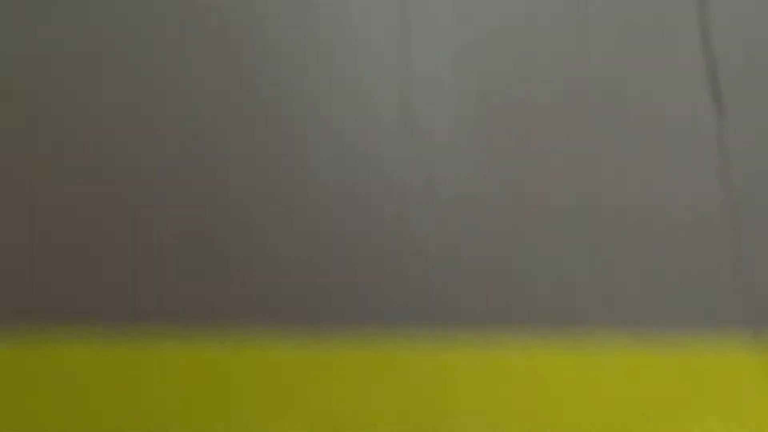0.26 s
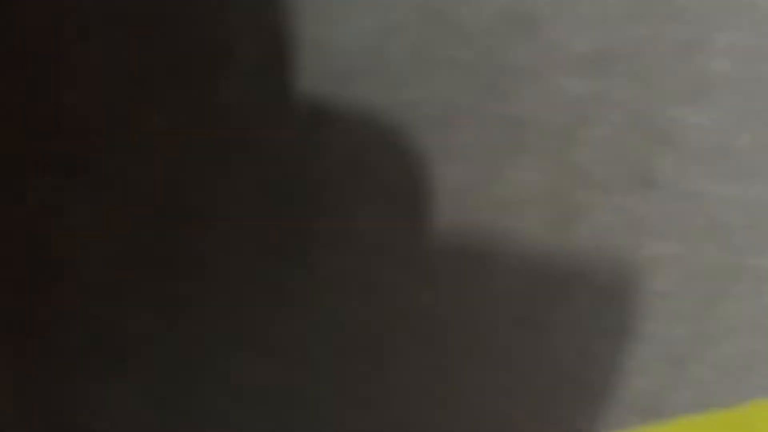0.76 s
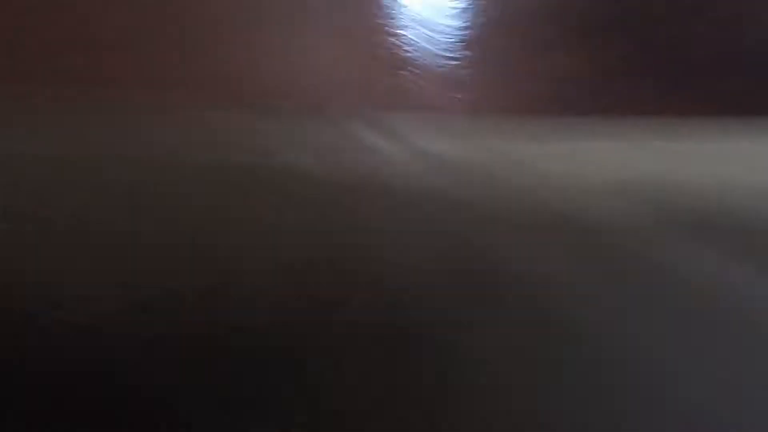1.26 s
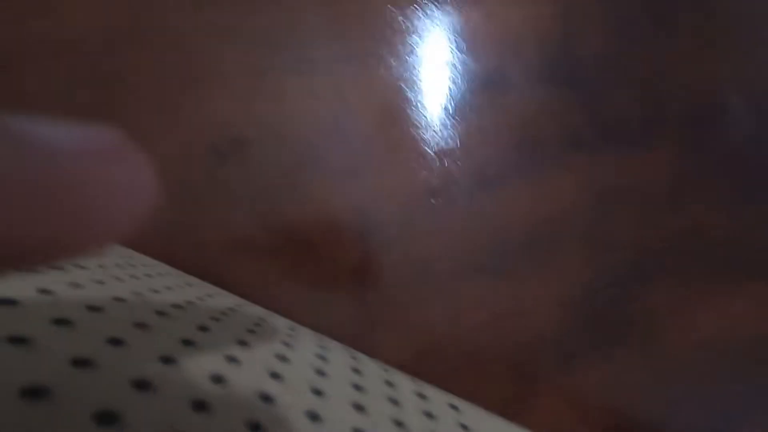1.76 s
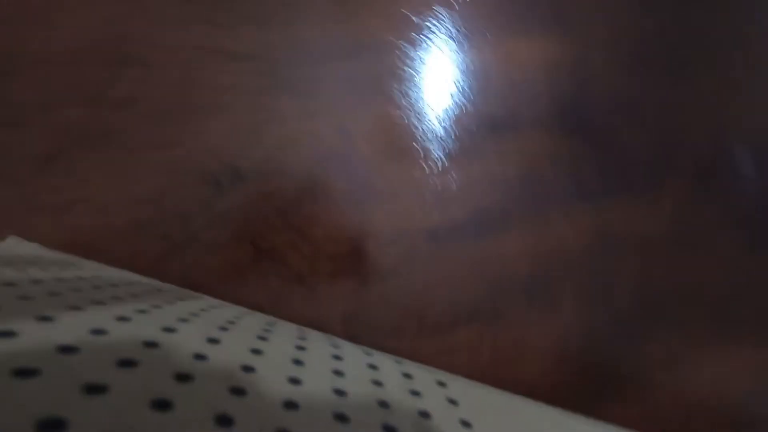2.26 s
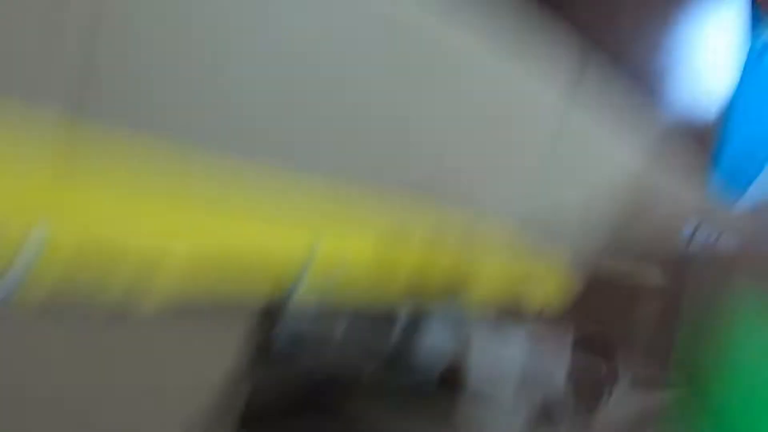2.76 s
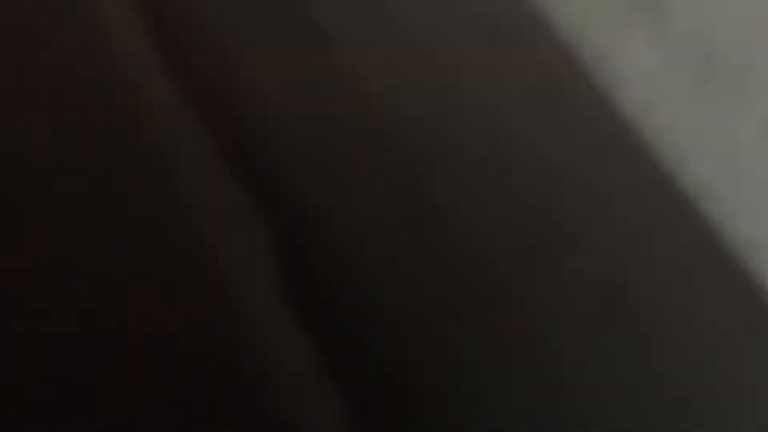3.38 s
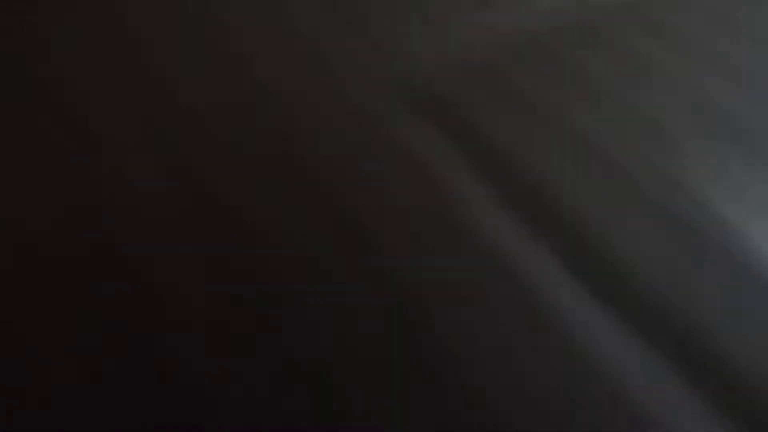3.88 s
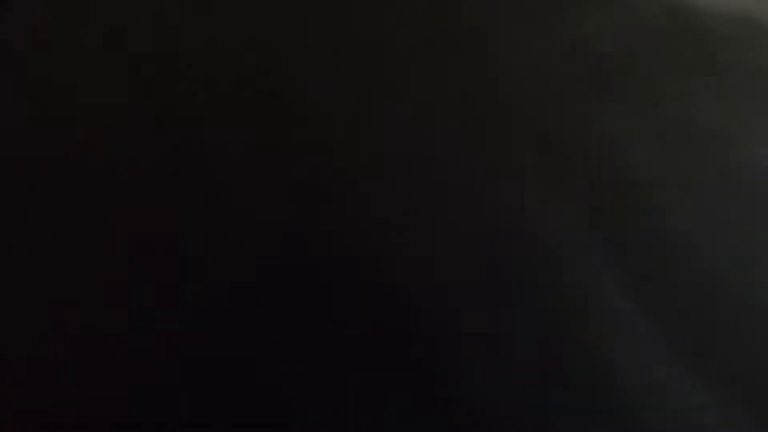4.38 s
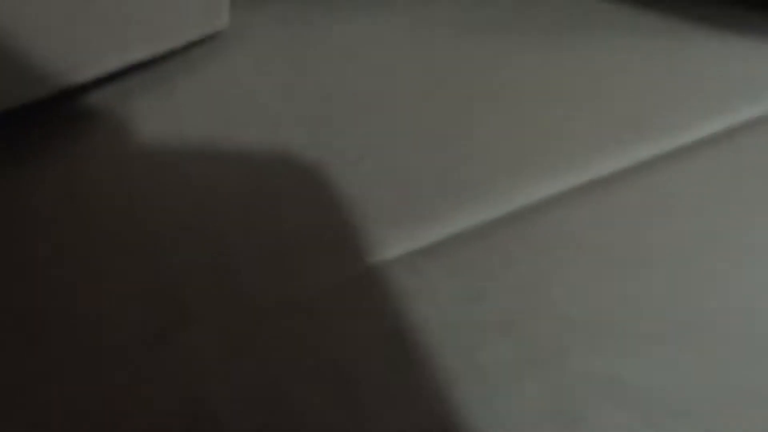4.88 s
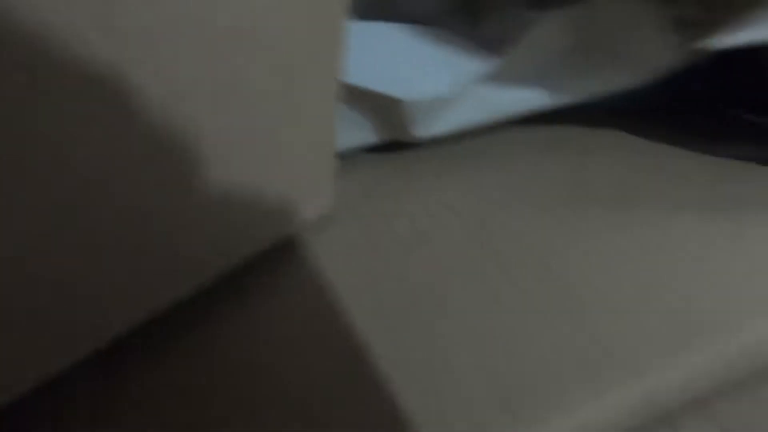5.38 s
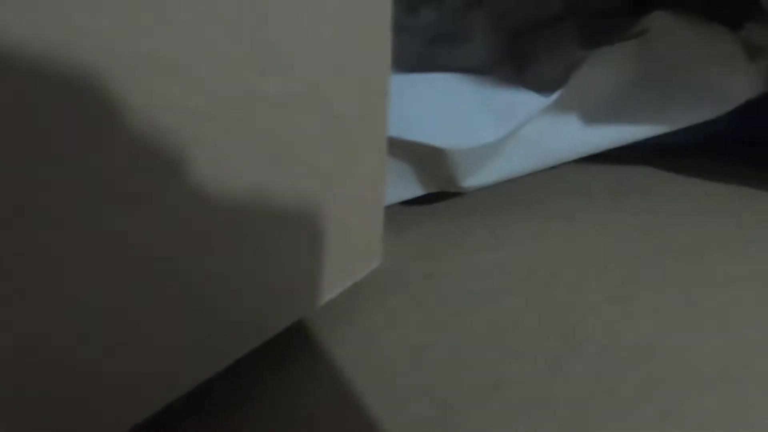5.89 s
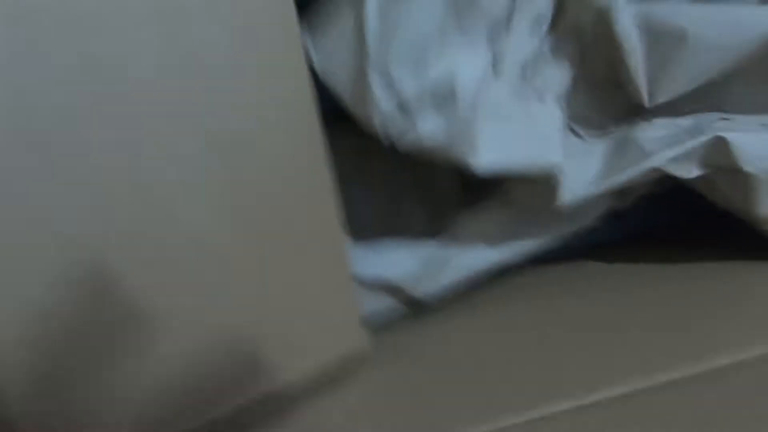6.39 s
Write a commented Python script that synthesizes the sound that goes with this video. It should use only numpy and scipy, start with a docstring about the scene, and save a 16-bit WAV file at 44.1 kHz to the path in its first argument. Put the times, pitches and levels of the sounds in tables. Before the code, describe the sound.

Close cardboard handling in a small room, with faint appliance hum and airy whirr beneath. From 0 to 0.4 s, soft dry rubbing and light taps; around 0.45-0.65 s, strong hollow knocks and a short raspy scrape, then a crack at 0.85. From 1.15 to 1.5 s, sharp cracks, tape-like snaps and thuds cluster, with a low puff of air near 1.3. More buckling and gritty rubbing run from 1.7 to 2.15 s, a knock at 2.4, then a lull with tiny paper crinkles until 3.05. Bumps resume at 3.2; low booms and cracks surge at 3.6-3.75. The heaviest thuds fall at 4.0-4.45 s, with a brief squeak snapping free at 4.3. Deep bumps follow to 4.8 s, then sparse rubbing, soft scrapes, a paper tick at 6.05 and a last crack with a scrape at 6.62.

```python
"""A hand rubs over board above a faint appliance hum; then knocks, cracks and scrapes follow as a cardboard
shipping box is turned over and opened on a table, close to the microphone, in a small room.
Friction is random stick-slip clicks through resonances; thuds are decaying panel modes, cracks damped bursts.
Tape snaps, paper crinkles, a flap squeaks and one puff of air buffets the ports. Swaying pushes air and
booms the cavity; hum is wavering sines, whirr and room air are coloured noise; the stereo width varies."""
import sys
import numpy as np
from scipy import signal
from scipy.fft import rfft, irfft, next_fast_len
from scipy.io import wavfile
from scipy.ndimage import uniform_filter1d, map_coordinates

SR = 44100
rng = np.random.default_rng(int(sys.argv[2]) if len(sys.argv) > 2 else 0)


def inscribe(sig):
    """Save sig as 16-bit PCM at rate SR to the path in sys.argv[1].

    A 1-D sig is mono; a 2-D sig holds one channel per row.
    Samples are clipped to [-1, 1] before scaling.
    """
    pcm = np.round(np.clip(np.atleast_2d(sig).T, -1, 1) * 32767)
    wavfile.write(sys.argv[1], SR, pcm.astype(np.int16))


N = 292816
TIME = np.arange(N) / SR


def from_db(db):
    """Amplitude ratio of a level in decibels."""
    return 10 ** (np.asarray(db) / 20)


def rms_one(x):
    """Normalise the effective value to 1."""
    return x / np.sqrt(np.mean(x ** 2) + 1e-20)


def peak_one(x):
    """Normalise the largest excursion to 1."""
    return x / (np.abs(x).max() + 1e-20)


def evened(x):
    """Level normalisation: divide by the running rms over a tenth of a second."""
    return x / np.sqrt(uniform_filter1d(x ** 2, size=SR // 10) + 1e-12)


def gains(rows):
    """Interpolate the level columns of a curve in dB and return them as gains at every sample."""
    times, *columns = np.transpose(rows)
    return [from_db(np.interp(TIME, times, levels)) for levels in columns]


def add(track, start_s, sound):
    """Superposition: mix a sound into a track from start_s on."""
    at = max(round(start_s * SR), 0)
    track[..., at:at + sound.shape[-1]] += sound[..., :max(N - at, 0)]


def coloured(x, spectrum):
    """Spectral shaping: filter by a curve interpolated in dB over log frequency."""
    size = next_fast_len(N + 4096)
    hz, db = np.transpose(spectrum)
    bins = np.maximum(np.arange(size // 2 + 1) * SR / size, 1)
    response = from_db(np.interp(np.log(bins), np.log(hz), db))
    return irfft(rfft(x, size) * response, size)[..., :N]


def butter(x, hz, kind, order=2):
    """Butterworth filtering: a maximally flat passband."""
    sections = signal.butter(order, np.clip(hz, 10, .45 * SR), kind, fs=SR, output="sos")
    return signal.sosfilt(sections, x)


def resonance(x, hz, width_hz):
    """Damped resonator: a two-pole filter whose bandwidth sets how fast it decays."""
    r = np.exp(-np.pi * width_hz / SR)
    numerator = np.array([1, 0, -1]) * (1 - r * r) / 2
    return signal.lfilter(numerator, [1, -2 * r * np.cos(2 * np.pi * hz / SR), r * r], x)


def drift(rate, size=N):
    """Random fluctuation: straight lines between Gaussian values of spread 1, rate of them a second."""
    knots = rng.standard_normal(4000)
    return np.interp(np.arange(size) / SR * rate, np.arange(len(knots)), knots)


def slips(per_s, spread_db, size=N):
    """Stick-slip: fibres catch and let go in random clicks whose sizes scatter upwards by spread_db."""
    sizes = from_db(spread_db * np.minimum(rng.exponential(1, size), 4)) * rng.choice([-1, 1], size)
    return rms_one(sizes * (rng.random(size) < per_s / SR))


def scattered(x, decay_s, rate):
    """Multipath interference: a drifting mix of flat-spectrum scattering paths, of constant total power."""
    t, out = np.arange(512) / SR, 0
    shares = np.array([drift(rate) for _ in range(4)])
    for share in shares / np.linalg.norm(shares, axis=0):
        response = rfft(rng.standard_normal(len(t)) * np.exp(-t / decay_s), 4096)
        paths = irfft(response / np.abs(response))[:1024]   # keep the phases only
        out = out + share * signal.oaconvolve(x, paths)[:N]
    return out


# Partials of the appliance hum: pitch_hz [Hz], level_db [dB, relative]
HUM_PARTIALS = [(118.4, -55), (261, -69), (328.4, -59.5), (414.5, -61.5), (479.1, -65), (660, -73),
                (721.4, -66), (796.7, -67), (850.6, -68), (888.2, -86)]
# Spectrum of its whirr: pitch_hz [Hz], level_db [dB per Hz, relative]
FAN_SPECTRUM = [(50, -16), (130, -4), (230, 12.5), (500, 11.5), (850, -9), (1050, -26), (7500, -13),
                (16000, -27)]


def distant_fan(air_db, hum_db, waver, apart):
    """Diffuse field: noise independent at each port, and hum partials whose phase differs between ports."""
    hum = 0
    for hz, db in HUM_PARTIALS:
        port_phase = apart * hz / 500 * (1 + 0.13 * drift(1)) * np.array([[1], [-1]])
        phase = 2 * np.pi * hz * TIME + waver * drift(1.56) + port_phase
        hum = hum + from_db(db + 2 * drift(2.13)) * np.sqrt(2) * np.sin(phase)
    whirr = rms_one(coloured(rng.standard_normal((2, N)), FAN_SPECTRUM))
    return from_db(hum_db) * hum + from_db(air_db) * whirr


# Spectrum of the still room: pitch_hz [Hz], level_db [dB per Hz, relative]
ROOM_AIR_SPECTRUM = [(20, -5), (60, -9), (200, -9), (800, -76), (2000, -32), (7000, -39.5), (16000, -78)]


def background(air_db):
    """Stationary noise: still room air at a constant level."""
    return from_db(air_db) * rms_one(coloured(rng.standard_normal(N), ROOM_AIR_SPECTRUM))


# A hand slides over the board, pressing harder and letting go: start_s [s, hardest press], swell_s [s],
# fade_s [s], rasp_db [dB, relative], drone_db [dB re rasp], hiss_db [dB re rasp], before the friction mix
STROKES = [(0.12, 1, 0.3, -56.5, 10, 3.5), (0.35, 0.21, 0.45, -46, 7.5, -9.5),
           (0.63, 0.11, 0.096, -29, 9, -15.5), (0.86, 0.22, 0.41, -45, 5.5, -9),
           (1.151, 0.042, 0.028, -41.5, 10, -1.5), (1.255, 0.14, 1, -40.5, 7.5, -4.5),
           (1.455, 0.075, 0.15, -36, 17.5, -5.5), (1.783, 0.053, 0.15, -30, 13.5, -10),
           (2.0, 0.029, 0.18, -36, 19.5, -3.5), (2.11, 0.28, 0.21, -29.5, 11, -13),
           (2.35, 0.15, 0.17, -35, 6.5, -19), (2.55, 0.2, 0.18, -41, 9.5, -12),
           (3.181, 0.077, 0.37, -37, 10, -34), (3.409, 0.27, 0.13, -48.5, 14.5, 11.5),
           (3.658, 0.13, 0.087, -25.5, 9, -6), (3.94, 0.67, 0.33, -36.5, 7.5, -8),
           (4.03, 0.05, 0.34, -34.5, 14.5, -20), (4.317, 0.052, 0.074, -35.5, 17, -11.5),
           (4.439, 0.26, 0.29, -34.5, 8, -13), (4.785, 0.11, 0.22, -40, 14, -9.5),
           (5.11, 0.13, 0.11, -49, 7, -5), (5.408, 0.23, 0.29, -63, -4, 10.5),
           (5.47, 0.027, 0.46, -41, 11.5, -33), (5.73, 0.32, 0.32, -36.5, 3.5, -10.5),
           (6.026, 0.06, 0.23, -38.5, 10.5, -6.5), (6.35, 0.1, 0.1, -38, 4.5, -5.5),
           (6.51, 0.095, 0.24, -38, 2.5, -6)]
STROKE_RANGE_DB = 18   # a stroke gains this much during its swell and loses it during its fade


def hand_pressure():
    """Energy addition: gains of rasp, drone and hiss, overlapping strokes summed in power."""
    power = np.zeros((3, N))
    for start_s, swell_s, fade_s, db, drone_db, hiss_db in STROKES:
        away = np.maximum((start_s - TIME) / swell_s, (TIME - start_s) / fade_s)
        lifted = np.maximum(away - 1, 0) ** 2   # the hand lifts off: a steeper fall
        press_db = db - STROKE_RANGE_DB * np.minimum(away + lifted, 10)
        power += np.outer(from_db([0, drone_db, hiss_db]), from_db(press_db)) ** 2
    return np.sqrt(power)


# Spectra of panel drone, liner rasp and skin hiss: pitch_hz [Hz], level_db [dB per Hz, relative]
DRONE_SPECTRUM = [(70, -20), (140, -2), (200, 3.5), (270, -0.5), (430, -4.5), (600, -26), (4000, -82)]
RASP_SPECTRUM = [(250, -22), (540, 8.5), (720, 1.5), (900, -1), (1100, -1), (1400, -5), (1750, -11.5),
                 (2100, -13), (2800, -18.5), (15000, -84)]
HISS_SPECTRUM = [(300, 4.5), (3300, 3), (4800, -2.5), (7000, -4.5), (10000, -11.5), (13000, -17),
                 (16000, -55)]
FLUTES_PER_S = 64.8   # about how often an edge or hand bumps over the ribs of the board


def rubbing(pressure, grip_db, flicker_db, flute_db, drone_db, rasp_db, hiss_db):
    """Stick-slip friction: panels and liner are shaken together by an uneven grip and the flutes."""
    rasp, drone, hiss = pressure
    flutes = np.cumsum(FLUTES_PER_S * (1 + .5 * drift(40))) / SR
    grip = from_db(grip_db * drift(70) + flute_db * np.cos(2 * np.pi * flutes))
    fibres = slips(per_s=1800, spread_db=0.0) * grip
    panels = rms_one(coloured(slips(per_s=900, spread_db=0.5) * grip, DRONE_SPECTRUM))
    liner = rms_one(coloured(fibres * from_db(flicker_db * drift(260)), RASP_SPECTRUM))
    skin = rms_one(coloured(fibres + 0.96 * rng.standard_normal(N), HISS_SPECTRUM))
    drone_sound = from_db(drone_db) * drone * panels
    rasp_sound = from_db(rasp_db) * rasp * liner
    return drone_sound + rasp_sound + from_db(hiss_db) * hiss * skin


def crunching(pressure, per_s, level_db, damping, top_hz):
    """Granular excitation: random slips ring broad liner resonances, louder while a hand presses."""
    rasp, drone, hiss = pressure
    liner_hz = (735, 1150, 1570, 2020, 3570)
    grains = sum(resonance(slips(per_s=per_s, spread_db=0.0), hz, damping * hz) for hz in liner_hz)
    return from_db(level_db) * rasp * rms_one(butter(grains, top_hz, "low"))


def hollow(x):
    """Comb-like interference: reflections inside the box carve wandering peaks and dips into friction."""
    return .9 * x + .44 * scattered(x, decay_s=.0013, rate=9)


# How strongly the whole box sways in the hands: start_s [s], level_db [dB, relative]
SWAY = [(0.0, -43.5), (0.5, -33), (1.0, -47), (1.35, -43), (1.68, -65), (2.1, -32), (2.5, -61), (2.86, -36),
        (3.0, -39.5), (3.55, -45), (3.74, -18.5), (3.9, -42), (4.08, -31), (4.5, -23), (4.85, -38.5),
        (5.02, -35), (5.3, -71), (5.52, -28.5), (6.64, -32.5)]
# Spectrum of the pushed air: pitch_hz [Hz], level_db [dB per Hz, relative]
SWAY_SPECTRUM = [(12, -21), (25, 23.5), (38, 17.5), (60, 10.5), (110, -22), (800, -100)]


def swaying(pressure, air_db, boom_db, hand_boom_db, blow_boom_db, boom_t60, cavity_hz, width_hz):
    """Cavity resonance: sway pushes air; sway, rubbing and deep blows keep the enclosed air booming."""
    rasp, drone, hiss = pressure
    sway, = gains(SWAY)
    pushes = rms_one(coloured(rng.standard_normal(N), SWAY_SPECTRUM))
    jolts = slips(per_s=75, spread_db=1.0)
    cavity = evened(butter(resonance(jolts, cavity_hz, width_hz), 2 * cavity_hz, "low", order=4))
    t = np.arange(SR // 2) / SR
    power = (from_db(boom_db) * sway) ** 2 + (from_db(hand_boom_db) * drone) ** 2
    for start_s, db, hz in blows():
        decay = from_db(db + blow_boom_db - 60 * t / boom_t60)
        onset = np.minimum(t * cavity_hz, 1)   # one cavity cycle to build up
        add(power, start_s, (decay * onset * cavity_hz / hz) ** 2)
    return from_db(air_db) * sway * pushes + np.sqrt(power) * cavity


# A hand or flap bumps a panel, or the rocking box knocks again: start_s [s], level_db [dB peak, relative], #
# pitch_hz [Hz, struck spot]
KNOCKS = [(.196, -25.5, 209), (.433, -14.5, 147), (.483, -10, 385), (.485, -3, 192), (.625, -10.5, 159),
          (1.243, -14.5, 206), (1.416, -15.5, 292), (1.714, -19, 230), (1.931, -15.5, 240),
          (2.393, -12, 197), (3.028, -35, 308), (3.173, -17, 143), (3.33, -15.5, 156), (3.379, -11, 215),
          (3.584, -12.5, 258), (4.001, -7.5, 452), (4.021, -7, 133), (4.093, -11, 89.5),
          (4.433, -4.5, 123.8), (4.596, -11.5, 70), (4.784, -10.5, 95), (4.824, -11.5, 61.2),
          (5.449, -15.5, 136), (6.013, -13, 123.5), (6.344, -17.5, 98.4)]
# A struck panel bounces back once, a few swings later, weaker and lower
REBOUND_CYCLES, REBOUND_LOSS_DB, REBOUND_PITCH_RATIO = 3.8, 11.5, 0.67


def blows():
    """Impact and rebound: every knock and buckle, then its rebound, as (start_s, level_db, pitch_hz)."""
    first = list(KNOCKS) + [(s, thud_db, hz) for s, _, _, _, thud_db, hz, _ in BUCKLES]
    rebounds = [(s + REBOUND_CYCLES / hz, db - REBOUND_LOSS_DB, hz * REBOUND_PITCH_RATIO)
                for s, db, hz in first]
    return first + rebounds


# Bending modes of the box: pitch_hz [Hz], level_db [dB, relative]
PANEL_MODES = [(86, -3.5), (130, 0.5), (158, -10.5), (192, -2), (258, 1), (290, -1.5), (340, -1.5),
               (415, -2), (480, 3.5), (684, 2), (900, -11.5)]


def knocks(level_db, reach_octaves, chance_db, spot_t60, modes_db, lowest_t60, yield_cycles, top_ratio):
    """Modal excitation: the struck spot swings and rings modes near its pitch; high modes die sooner."""
    out, t = np.zeros(N), np.arange(SR // 3) / SR
    hz, mode_db = np.transpose(PANEL_MODES)
    t60 = lowest_t60 * np.sqrt(hz[0] / hz)
    rings = np.sin(2 * np.pi * np.outer(hz, t)) * from_db(-60 * np.outer(1 / t60, t))
    for start_s, db, spot_hz in blows():
        chance = chance_db * rng.standard_normal(len(hz))
        strength = from_db(mode_db + chance) * rng.choice([-1, 1], len(hz))
        nearness = 1 / (1 + (np.log2(hz / spot_hz) / reach_octaves) ** 2)
        modes = strength * nearness @ rings
        spot = np.sin(2 * np.pi * spot_hz * t) * from_db(-60 * t / spot_t60)
        push = 1 - np.exp(-t * spot_hz / yield_cycles)   # soft board takes a moment to yield
        swing = push * (peak_one(spot) + from_db(modes_db) * peak_one(modes))
        thud = butter(swing, [spot_hz / 2, top_ratio * spot_hz], "band")
        add(out, start_s, from_db(db + level_db) * peak_one(thud))
    return out


# A crease cracks and its panel springs over with a thud: start_s [s], crack_db [dB peak, relative],
# crack_hz [Hz], treble_db [dB, relative], thud_db [dB peak, relative], panel_hz [Hz],
# splinter_db [dB, relative to the crack's force]
BUCKLES = [(0.265, -23, 1260, 3.5, -23.5, 180, -21), (0.837, -10, 620, -9, -17.5, 144.4, -23.5),
           (1.06, -22.5, 1050, 5.5, -18, 195, -21.5), (1.1596, -5.5, 1150, -13, -15, 324, -25.5),
           (1.297, -6.5, 920, -6, -7, 176, -32), (1.444, -9, 1150, 1.5, -6.5, 275, -23),
           (1.511, -9, 960, -13, -14, 244, -5), (1.776, -10, 1110, -1, -2, 229, -14),
           (1.990, -6, 960, -10.5, -9, 227, -11.5), (2.036, -11.5, 920, -2, -10.5, 238, -17),
           (2.094, -7, 880, -9, -11.5, 268, -6), (2.127, -11, 990, -11, -13, 208, -13),
           (3.6275, -8.5, 1010, -12, -4.5, 346, -12), (3.669, -6, 770, -7, -5.5, 154, -14),
           (4.0, -4.5, 640, -0.5, 0, 201, -20), (4.3067, 1, 1050, -18, -4.5, 131, -24),
           (4.7448, -9, 790, -11, -8.5, 128, -19), (6.619, -13, 1200, -3, -8.5, 317, -9)]
# Tape and liner snap: start_s [s], level_db [dB peak, relative], pitch_hz [Hz], treble_db [dB, relative]
TICKS = [(.754, -21, 1900, -2.5), (.902, -11, 1810, -2), (.928, -23.5, 2550, 9), (1.243, -10.5, 3580, 5),
         (1.261, -12, 3970, -18), (1.376, -5.5, 1950, 7), (1.415, -8, 1080, -10), (1.422, -10.5, 1600, 0),
         (1.435, -6, 950, -18), (1.7412, -13, 1750, -2), (1.77, -19, 2020, -17), (1.788, -12, 1810, -5),
         (2.084, -14, 1500, -7), (2.104, -10.5, 950, -10), (2.968, -28.5, 1150, -1),
         (3.5597, -17.5, 2070, -19), (4.023, -14, 760, -4), (4.031, -4.5, 1050, -23),
         (4.587, -19.5, 1090, -5), (4.665, -13.5, 800, 0), (6.054, -9.5, 740, 0.5), (6.168, -21, 2500, 1)]


def breaks(tick_splinter_db):
    """Sudden fracture: every snap and crease as (start_s, level_db, pitch_hz, treble_db, splinter_db)."""
    snaps = [(*tick, tick_splinter_db) for tick in TICKS]
    creases = [(s, db, hz, bright_db, splinter_db) for s, db, hz, bright_db, _, _, splinter_db in BUCKLES]
    return snaps + creases


def cracks(level_db, damping, tick_splinter_db, splinter_cycles, strain_cycles, treble_db):
    """Strain release: splintering builds to one sharp click and dies out, sooner at high pitch."""
    lead = SR // 50
    out, t = np.zeros(N), np.arange(-lead, 2 * lead) / SR
    for start_s, db, hz, bright_db, splinter_db in breaks(tick_splinter_db):
        away = np.where(t < 0, -t / strain_cycles, t / splinter_cycles)
        splintering = from_db(splinter_db - 60 * hz * away)
        force = (t == 0) + splintering * slips(per_s=4900, spread_db=4.0, size=len(t))
        body = peak_one(butter(resonance(force, hz, damping * hz), 3.44 * hz, "low", order=3))
        edge = peak_one(butter(force, [3500, 9500], "band"))
        crack = peak_one(body + from_db(bright_db + treble_db) * edge)
        add(out, start_s + t[0], from_db(db + level_db) * crack)
    return out


# Ringing pitches of the stiff flaps: pitch_hz [Hz]
FLAP_PITCHES = [905, 1268, 1867]


def flaps_ringing(x, ring_db, width_hz):
    """Sympathetic resonance: every crack and rub also sets the flaps ringing briefly."""
    return x + from_db(ring_db) * sum(resonance(x, hz, width_hz) for hz in FLAP_PITCHES)


# A flap edge or tape dragged over the board: start_s [s], length_s [s], level_db [dB, relative],
# pitch_hz [Hz, before glide and wander], treble_db [dB re rasp]
SCRAPES = [(0.474, 0.017, -28, 920, -8.5), (.547, 0.14, -22.5, 1210, -22.5),
           (1.234, 0.047, -32, 1840, -4.5), (1.759, 0.021, -25, 1700, -12),
           (3.572, 0.014, -23.5, 1770, -15), (3.607, 0.084, -36, 786, -6), (4.016, 0.022, -10.5, 760, -23),
           (4.428, 0.023, -26, 1420, -39), (4.744, 0.11, -38.5, 1080, -26), (5.668, 0.067, -32, 570, -21),
           (5.721, 0.1, -37, 844, -17), (6.624, 0.024, -19, 910, -16)]


def scrapes(damping, chatter_db, crest, flute_db, unevenness, glide, wander, overtone_db, overtone_ratio):
    """Periodic stick-slip: an edge bumps over flutes, rising and brightening with pressure, then slips free."""
    out, size = np.zeros(N), SR // 5
    for start_s, length, db, hz, bright_db in SCRAPES:
        pressure = np.interp(np.arange(size) / SR / length, [0, np.clip(crest, .1, .9), 1], [0, 1, 0])
        flute_rate = FLUTES_PER_S * (1 + unevenness * drift(64, size=size))
        flutes = np.cumsum(flute_rate) / SR + rng.random()
        catching_db = flute_db * np.cos(2 * np.pi * flutes) + chatter_db * drift(306.0, size=size)
        force = slips(per_s=1100, spread_db=2.0, size=size) * from_db(catching_db)
        rasp = rms_one(butter(resonance(force, hz, damping * hz), 2 * hz, "low", order=3))
        over_hz = overtone_ratio * hz
        overtone = rms_one(butter(resonance(force, over_hz, 2 * damping * hz), over_hz, "low", order=3))
        rasp = rasp + from_db(overtone_db) * pressure * overtone
        # reading faster or slower bends the pitch
        speed = 1 + glide * (pressure - .5) + wander * drift(FLUTES_PER_S, size=size)
        rasp = map_coordinates(rasp, [np.cumsum(speed)], mode="mirror")
        hiss = rms_one(butter(butter(force, [3000, 10500], "band", order=3), 6700, "low", order=1))
        add(out, start_s, from_db(db) * (rasp + from_db(bright_db) * hiss) * pressure)
    return out


GUST_S, GUST_WIDTH_S = 1.29, 0.047   # a flap swings past and fans air over the ports


def gust(level_db, top_hz):
    """Turbulent pressure: independent low-frequency noise buffets each port under a bell-shaped swell."""
    eddies = butter(butter(rng.standard_normal((2, N)), top_hz, "low", order=4), 22, "high")
    return from_db(level_db) * rms_one(eddies) * np.exp(-((TIME - GUST_S) / GUST_WIDTH_S) ** 2)


# Packing paper shifts: start_s [s], level_db [dB peak, relative], treble_db [dB re folds]
CRINKLES = [(2.697, -40, -6), (2.749, -36.5, -16), (2.787, -30, -14), (2.877, -25, -14), (3.027, -32, -19),
            (3.924, -23, -7.5), (4.459, -23.5, -11), (6.046, -20.5, -11)]
# Resonances of the paper's folds: pitch_hz [Hz, nominal], level_db [dB, relative]
PAPER_FOLDS = [(2100, -10), (2950, 1.5), (4100, 2.5), (5400, -2.5), (6800, -1.5)]


def packing_paper(level_db, rise_s, fall_s, settle_db, settle_s, damping):
    """Snap-through: a fold pops in a quick run of tiny snaps, then the sheet settles with a faint rustle."""
    lead = SR // 50
    out, t = np.zeros(N), np.arange(-lead, 4 * lead) / SR
    pop = np.exp(-np.abs(t) / np.where(t < 0, rise_s, fall_s))
    rustle = np.exp(-np.abs(t) / np.where(t < 0, fall_s, settle_s))
    swell = pop + from_db(settle_db) * rustle
    for start_s, db, bright_db in CRINKLES:
        force = swell * slips(per_s=5000, spread_db=0.5, size=len(t))
        folds = 0
        for hz, fold_db in PAPER_FOLDS:
            fold_hz = hz * (1 + 0.054 * rng.standard_normal())
            folds = folds + from_db(fold_db) * resonance(force, fold_hz, damping * hz)
        fizz = butter(force, [5000, 12000], "band")
        crinkle = peak_one(butter(folds, 6100, "low")) + from_db(bright_db) * peak_one(fizz)
        add(out, start_s + t[0], from_db(db + level_db) * peak_one(crinkle))
    return out


# Resonances of the squeaking flap: pitch_hz [Hz], level_db [dB, relative]
SQUEAK_MODES = [(1250, -1.5), (1890, -6), (3600, -16), (6360, -16.5), (7600, -16), (12000, -25)]
SQUEAK_END_S = 4.305   # a wedged flap slips free


def squeak(level_db, swell_s, release_s, damping):
    """Friction-driven resonance: a wedged flap drags on its neighbour, louder until it snaps free."""
    force = slips(per_s=7400, spread_db=1.5)
    voice = 0
    for hz, db in SQUEAK_MODES:
        mode = resonance(resonance(force, hz, damping * hz), hz, damping * hz)
        voice = voice + from_db(db) * rms_one(mode)
    away = np.maximum((SQUEAK_END_S - TIME) / swell_s, (TIME - SQUEAK_END_S) / release_s)
    return from_db(level_db) * rms_one(voice) * np.exp(-np.minimum(away, 20))


ROOM_T60_S = 0.71   # decay rate as a 60 dB time; the tail ends after half a second


def room(x, wet_db, wall_hz):
    """Reverberation: a short diffuse tail of exponentially decaying noise, dulled by the walls."""
    t = np.arange(SR // 2) / SR
    tail = rng.standard_normal(len(t)) * from_db(-60 * t / ROOM_T60_S) * (t > .004)
    tail = butter(tail / np.sqrt(np.sum(tail ** 2)), wall_hz, "low")
    return from_db(wet_db) * signal.oaconvolve(x, tail)[:N]


# Stereo width over time, wide at first, nearly mono in the middle, wide again at the end:
# start_s [s], level_db [dB, side signal gain]
STEREO_WIDTH = [(0, 3), (1.42, 3), (1.85, -18.5), (2.9, -40), (3.4, -49), (5.3, -42), (5.75, -5), (6.64, 1)]
# Difference between the two ports: pitch_hz [Hz], level_db [dB side re mid, before the stereo width]
SIDE_SPECTRUM = [(60, -46), (200, -16), (400, -15.5), (700, -3), (4000, -7), (9000, 1)]


def two_ports(x, low_side_db, low_side_hz):
    """Mid-side decorrelation: scattered sound enters the two ports in opposite sign, by a varying width."""
    width, = gains(STEREO_WIDTH)
    paths = scattered(x, decay_s=0.0022, rate=15)
    # the low part of the scattered sound narrows twice as fast in dB as the stereo width
    low_side = from_db(low_side_db) * butter(paths, low_side_hz, "low", order=3) * width ** 2
    side = coloured(paths, SIDE_SPECTRUM) * width + low_side
    return x + side * np.array([[1], [-1]])


def scene():
    """Superposition of friction, thuds, cracks, sway and room, heard by two close ports."""
    pressure = hand_pressure()
    friction = rubbing(pressure, grip_db=3.0, flicker_db=0.5, flute_db=1.0,
                       drone_db=-1.5, rasp_db=-0.5, hiss_db=1.5)
    friction = friction + crunching(pressure, per_s=32, level_db=-7.5, damping=0.1, top_hz=2560)
    dragged = scrapes(damping=0.5, chatter_db=2.0, crest=0.54, flute_db=3.0, unevenness=0.43, glide=0.173,
                      wander=0.09, overtone_db=-10.5, overtone_ratio=2.4)
    friction = hollow(friction + dragged)
    friction = friction + squeak(level_db=-17.5, swell_s=0.012, release_s=0.0016, damping=0.14)
    thuds = knocks(level_db=-0.47, reach_octaves=0.88, chance_db=6.0, spot_t60=0.032, modes_db=1.0,
                   lowest_t60=0.15, yield_cycles=0.082, top_ratio=3.25)
    snaps = cracks(level_db=-4.5, damping=0.45, tick_splinter_db=-21, splinter_cycles=31.6,
                   strain_cycles=15, treble_db=-6.5)
    paper = packing_paper(level_db=-2.0, rise_s=.001, fall_s=0.0018, settle_db=-11, settle_s=0.019,
                          damping=0.21)
    box = flaps_ringing(friction + snaps, ring_db=-11, width_hz=37) + thuds + paper
    rumble = swaying(pressure, air_db=-0.5, boom_db=-6.5, hand_boom_db=-8.0, blow_boom_db=-1.5,
                     boom_t60=0.19, cavity_hz=66.8, width_hz=111)
    heard = box + room(box, wet_db=-16, wall_hz=4000) + rumble + background(air_db=-56.5)
    ports = two_ports(heard, low_side_db=-12.5, low_side_hz=88.5)
    ports = ports + gust(level_db=-19.5, top_hz=95)
    return ports + distant_fan(air_db=-60.5, hum_db=-4.0, waver=0.5, apart=0.15)


CUTOFF_HZ = 15700


def record(dry):
    """Saturation and band limiting: the loudest peaks are rounded and the top is cut."""
    rounded = 1.183 * np.tanh(dry / 1.184)
    top_cut = signal.ellip(10, .2, 80, CUTOFF_HZ, fs=SR, output="sos")
    return signal.sosfilt(top_cut, rounded)


dry = scene()
out = record(dry)
inscribe(out)
```